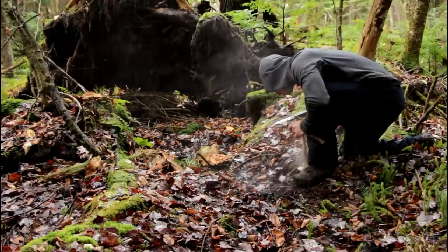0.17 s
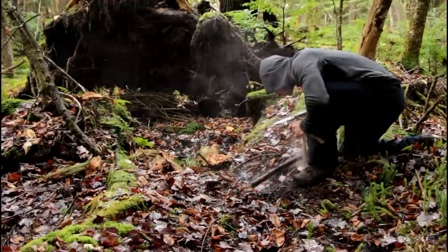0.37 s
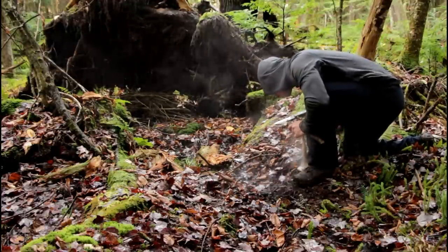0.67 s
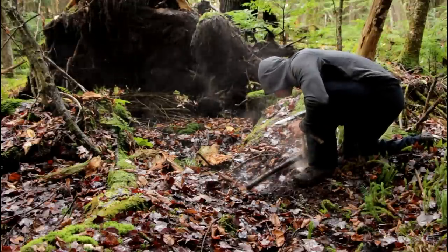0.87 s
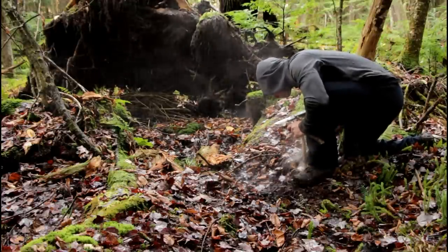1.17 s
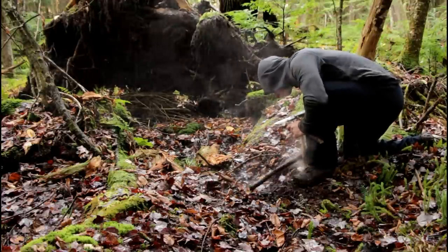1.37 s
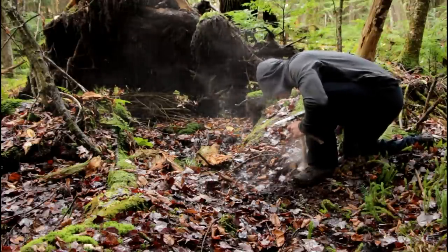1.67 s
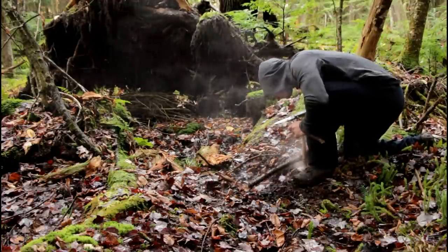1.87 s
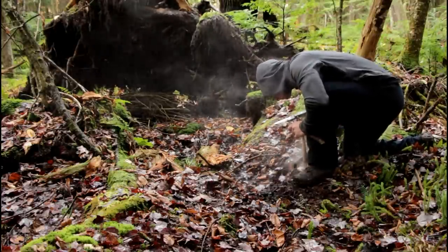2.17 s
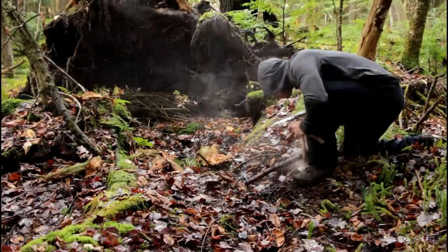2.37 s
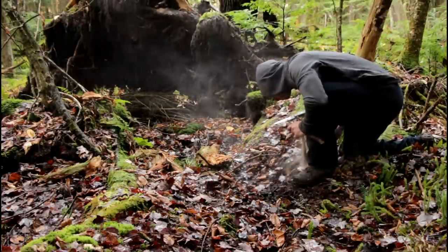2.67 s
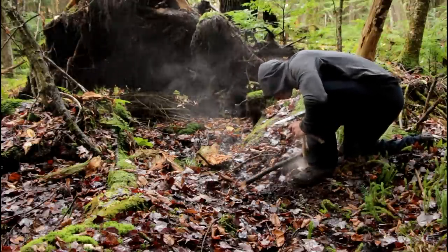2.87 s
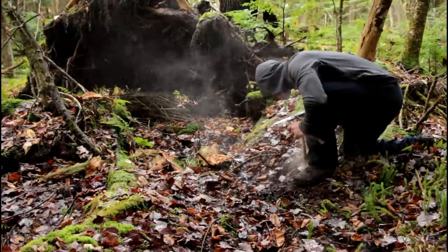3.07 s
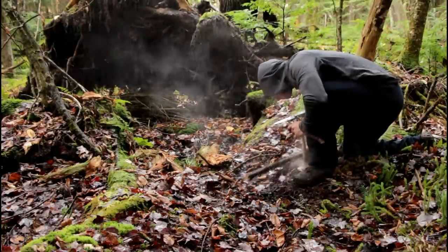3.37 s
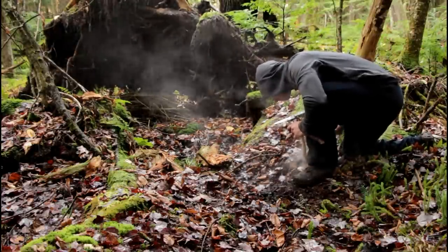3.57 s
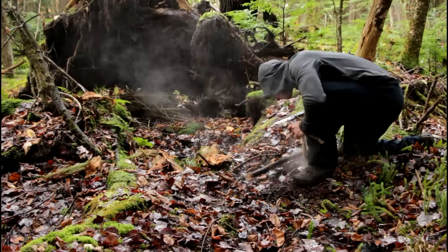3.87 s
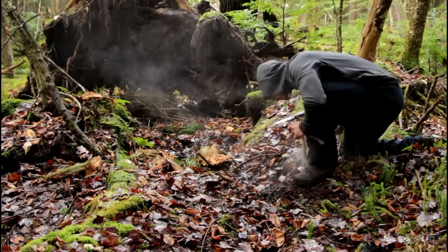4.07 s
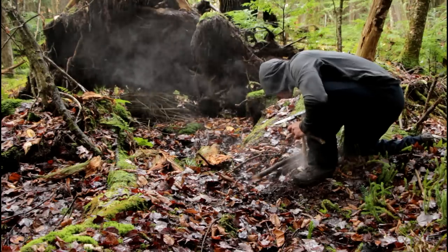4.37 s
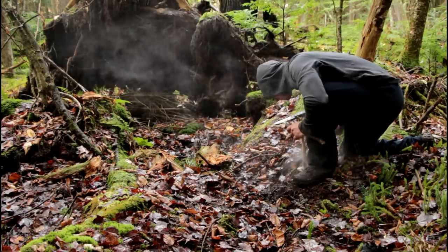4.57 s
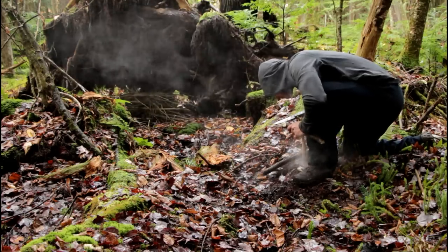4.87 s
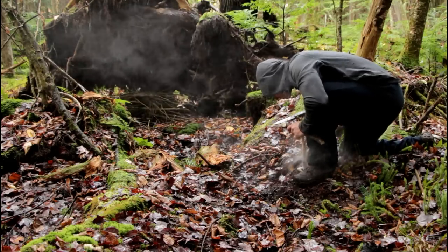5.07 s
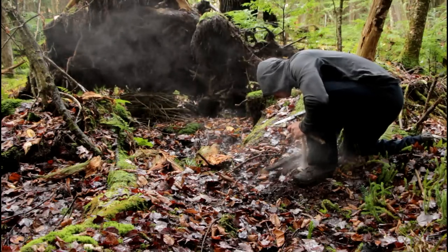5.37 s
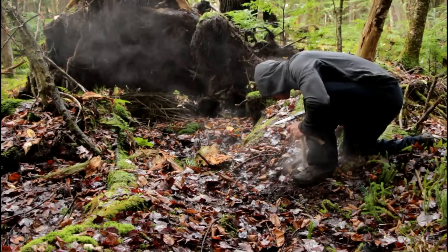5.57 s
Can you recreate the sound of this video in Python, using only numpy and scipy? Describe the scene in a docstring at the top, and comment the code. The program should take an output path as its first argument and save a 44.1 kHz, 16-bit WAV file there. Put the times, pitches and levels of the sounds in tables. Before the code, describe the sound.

Close outdoor sound of a bow drill on a forest floor. A hollow, dusty wooden grind on each push alternates with a high squeak on each pull, about two full cycles a second. Soft double thuds end the pushes, and small twigs snap irregularly. Past the middle a stick cracks loudly and the automatic gain dips, then slowly recovers. A harder push and short rustles follow. The stereo camera microphone also catches a faint forest stir.

```python
"""A bow drill starts with a push on a forest floor: the spindle grinds hollowly while small twigs snap and ticks fall.
Each push ends in a soft double thud of the board; each pull squeaks, often locking into a few pure chirps.
This goes on about twice a second; after 3.7 s a stick cracks loudly and makes the camera's gain control duck.
One push at 4.97 s is harder, then come short rustles. Noise makes the friction and rustles, bursts of fibres
the snaps, a gliding tone the squeak; a faint stir, a low hum and a short answer from the trees lie behind it all."""
import sys
import numpy as np
from scipy import signal
from scipy.fft import rfft, irfft, next_fast_len
from scipy.io import wavfile
from scipy.ndimage import uniform_filter1d, map_coordinates

SR = 44100
rng = np.random.default_rng(int(sys.argv[2]) if len(sys.argv) > 2 else 0)


def wav_out(sig):
    """Save sig, one row per channel (or a flat mono array), as 16-bit PCM at SR to the path in sys.argv[1]."""
    wavfile.write(sys.argv[1], SR, np.round(np.clip(np.atleast_2d(sig).T, -1, 1) * 32767).astype(np.int16))


N = 251806
TIME = np.arange(N) / SR


def amp(db):
    """Turn decibels into a gain."""
    return 10 ** (np.asarray(db) / 20)


def unit(x):
    """Scale to rms 1, a standard loudness."""
    return x / np.sqrt(np.mean(x ** 2) + 1e-20)


def along(points, hz):
    """Read a curve of (f/Hz, value) points, with frequency on a log axis."""
    f, value = np.transpose(points)
    return np.interp(np.log(hz + 1), np.log(f + 1), value)


def curves(rows):
    """Draw each column after the time as a curve with one value per sample."""
    s, *columns = np.transpose(rows)
    return [np.interp(TIME, s, column) for column in columns]


def wobble(rate):
    """A smooth random curve with rate random points a second."""
    points = rng.standard_normal(int(N * rate / SR) + 4)
    return map_coordinates(points, [TIME * rate])


def filtered(x, response):
    """Shape the frequencies of x by a complex response."""
    size = next_fast_len(N + SR // 2)
    hz = np.fft.rfftfreq(size, 1 / SR)
    return irfft(rfft(x, size) * response(hz), size)[..., :N]


def resonances(modes, f):
    """Response of things that ring: (f/Hz, width/Hz, level/dB) modes with alternating signs."""
    total = 0
    for k, (centre, width, db) in enumerate(modes):
        ring = 1j * f * width / (centre * centre - f * f + 1j * f * width)
        total = total + (-1) ** k * amp(db) * ring
    return total


# how alike left and right are: (f/Hz, likeness 0-1)
LIKENESS = [(60, .72), (130, 0.71), (290, 0.34), (640, 0.45), (1410, 0.32), (3100, 0.62), (6820, 0.48),
            (15000, 0.041)]


def spread(pair):
    """Two unrelated signals become left and right, more or less alike in each band; rms 1."""
    def turn(f):
        return np.arccos(np.clip(along(LIKENESS, f), 0, 1)) / 2
    mid, side = filtered(pair, lambda f: np.array([np.cos(turn(f)), np.sin(turn(f))]))
    return unit(np.array([mid + side, mid - side]))


def grains(response, rough_db, rate):
    """Stereo friction of rms 1: tiny slips, with rate random level points a second, through a response."""
    slips = rng.standard_normal((2, N)) * amp(rough_db * wobble(rate))
    return spread(filtered(slips, response))


def lead(x, delay):
    """Sound reaches the left side delay seconds before the right; below zero, the right comes first."""
    return filtered(x, lambda f: np.exp(1j * np.pi * f * delay * np.array([[1], [-1]])))


def add(track, s, sound):
    """Mix a sound into a track at time s."""
    part = track[..., max(round(s * SR), 0):][..., :sound.shape[-1]]
    part += sound[..., :part.shape[-1]]


def fracture(colour, t60, splinters, apart, size=4096):
    """A sharp release and a dying spray of fibres, coloured; as much energy as 10 ms at rms 1."""
    t = np.arange(size) / SR
    fibres = rng.standard_normal(size) + apart * rng.standard_normal((2, size))
    spray = fibres * amp(-60 * t / t60)
    force = rfft(splinters * spray - (t == 0))
    # even out the broad spectrum of the force, so that the colour alone sets the tone
    drive = np.sqrt(np.abs(uniform_filter1d(np.mean(np.abs(force) ** 2, axis=0), size=35)))
    wanted = colour(np.fft.rfftfreq(size, 1 / SR)) / drive
    # folding the cepstrum makes a filter that never sounds before the blow
    cepstrum = irfft(np.log(wanted + 1e-6))
    cepstrum[1:size // 2] *= 2
    cepstrum[size // 2 + 1:] = 0
    sound = irfft(force * np.exp(rfft(cepstrum)))
    return unit(sound) * np.sqrt(.01 * SR / size)


def hum():
    """A very faint, wavering 69 Hz hum, a sine whose phase wanders."""
    return amp(-84.0) * np.sin(2 * np.pi * 69 * TIME + .5 * wobble(3.22))


# colour of the forest's stir: (f/Hz, level/dB)
FOREST_COLOUR = [(25, -23), (52, -46), (69, -20), (82, -14), (150, -3), (350, 0), (1000, 0), (1800, -2),
                 (3000, -0.5), (5000, -6), (9000, -12.5), (16000, -20)]


def forest_stir():
    """The faint, steady stir of the forest: coloured noise."""
    return amp(-49.0) * grains(lambda f: amp(along(FOREST_COLOUR, f)), rough_db=2, rate=130)


# how long the answer takes to die by 60 dB: (f/Hz, t60/s)
TREE_DECAY = [(150, 0.22), (2000, 0.25), (12000, 0.05)]


def trees(x):
    """Trunks and the root wall scatter a short answer, made with a tail of dying noise."""
    noise = rng.standard_normal((2, SR // 3))
    hz, t, bands = signal.stft(noise, SR, nperseg=256)
    fade = amp(-60 * t / along(TREE_DECAY, hz)[:, None])
    tail = signal.istft(bands * fade, SR, nperseg=256)[1]
    return signal.fftconvolve(x, tail / np.linalg.norm(tail[0]), axes=1)[:, :N]


# swells of rough noise, one harder push at 4.97 s and then late rustles: (t/s, level/dB, half length/s)
ROUGH_SWELLS = [(4.974, -44, .03), (5.281, -36.5, 0.014), (5.38, -45.5, .11), (5.624, -41.5, 0.015)]
# colour of the rough noise: (f/Hz, level/dB)
ROUGH_COLOUR = [(100, -26), (480, 1.5), (900, -0.5), (2000, 0), (4000, 4), (9000, -3.5), (16000, -22)]


def rough_swells():
    """Rough noise that swells and fades: one harder push at 4.97 s, then late rustles."""
    swell = np.zeros(N)
    for s, db, width in ROUGH_SWELLS:
        swell += amp(db) * np.exp(-.5 * ((TIME - s) / width) ** 2)
    return swell * grains(lambda f: amp(along(ROUGH_COLOUR, f)), rough_db=2.5, rate=1200)


def damp_wood(f):
    """Damp wood gives off little of the highest treble."""
    return 1 / np.sqrt(1 + (f / 10500) ** 8)


def ticks(count=26):
    """Dry stalks and crumbs of char tick faintly at random times, each a tiny fracture."""
    out = np.zeros((2, N))
    for when, size, pitch in rng.random((count, 3)):
        hz = 1000 * 4 ** pitch
        colour = lambda f: damp_wood(f) * np.abs(resonances([(hz, 0.84 * hz, 0)], f)) ** 2.1
        tick = fracture(colour, t60=0.0059, splinters=0.14, apart=1.0)
        add(out, when * N / SR, amp(-57.5 + 7.2 * size) * tick)
    return out


# twig snaps, before the boosts and the sharpening in twigs():
# (t/s, level/dB, ring f/Hz, ring width/Hz, knock level/dB, splinter level/dB)
TWIG_SNAPS = [(0.01, -39.5, 1180, 800, -9.5, -18), (0.0187, -40.5, 2600, 1800, -19, -37),
              (0.2495, -49, 3480, 2400, -3, -21), (0.5046, -44.5, 2250, 1600, -12, -37),
              (0.8362, -43.5, 2390, 1700, -6, -21), (1.2225, -47, 2600, 1800, -4, -23),
              (1.357, -43.5, 1740, 1200, -7, -14), (1.7398, -31.5, 2320, 2660, -13.5, -17),
              (1.8676, -42, 1920, 1405, -11, -19), (1.9689, -44.5, 1770, 1200, -12, -33),
              (2.0313, -32, 2100, 1200, -20, -42), (2.4587, -41.5, 1450, 1000, -2, -22),
              (2.4845, -33, 3380, 2500, -26, -15), (2.6724, -34.5, 1750, 1320, -10.5, -10.5),
              (2.8207, -38, 2070, 1500, -11, -22), (2.8861, -37, 1760, 1209, -4.5, -34),
              (3.3996, -44.5, 2576, 1890, -10, -32), (3.8948, -47.5, 3700, 2600, -19, -29),
              (4.4429, -44.5, 2330, 1590, -13, -20), (4.8717, -50, 4430, 2980, -23, -25),
              (4.9262, -39.5, 1300, 1100, -28, -25), (5.5002, -35, 2270, 1710, -8, -8),
              (5.5977, -31, 3720, 653, -17, -36), (5.6042, -38.5, 3400, 300, -11, -36)]
# a typical snap's tear; more splinters tear for longer, twice as long for each 14 dB
TEAR_T60_S, TEAR_SPLINTER_DB, TEAR_DOUBLES_DB = .013, -23, 14


def twigs():
    """Small dry snaps: each fracture has its own ring, a knock in the ground and bright splinters."""
    out = np.zeros((2, N))
    for s, db, hz, width_hz, knock_db, splinter_db in TWIG_SNAPS:
        t60 = TEAR_T60_S * 2 ** ((splinter_db - TEAR_SPLINTER_DB) / TEAR_DOUBLES_DB)
        parts = [(hz, width_hz, 0), (420, 330, knock_db + 5), (8500, 5000, splinter_db)]
        # the power sharpens each peak
        colour = lambda f: damp_wood(f) * sum(np.abs(resonances([part], f)) ** 1.27 for part in parts)
        add(out, s, amp(db + 2.5) * fracture(colour, t60, splinters=0.23, apart=0.78))
    return out * amp([[-1], [.8]])


# the breaking stick and its bounces off the ground, before a 0.5 dB boost: (t/s, level/dB, t60/s)
STICK_CRACKS = [(3.7535, -14.5, .014), (3.7586, -29.5, 0.01), (3.761, -28.5, 0.035)]
# broad colour of the stick: (f/Hz, level/dB)
STICK_COLOUR = [(40, -31), (110, -27), (200, -4.5), (620, -2.5), (850, -5), (1100, -1), (1550, 1),
                (2400, -2), (3100, -10.5), (3900, -3.5), (5800, -9), (7500, -16.5), (10700, -15),
                (16000, -30)]


def stick():
    """A thicker stick breaks with one loud crack; its wood rings briefly in a few bands."""
    out = np.zeros((2, N))
    modes = [(340, 110, -5), (593, 180, -1.0), (1560, 190, -3.5), (2190, 123, -8.0),
             (3670, 170, -4.5), (4180, 120, -5), (5700, 220, 2)]  # (f/Hz, width/Hz, level/dB)
    colour = lambda f: amp(along(STICK_COLOUR, f)) * (0.9 + np.abs(resonances(modes, f)))
    for s, db, t60 in STICK_CRACKS:
        add(out, s, amp(db + 0.5) * fracture(colour, t60, splinters=0.21, apart=.2))
    return lead(out, delay=3e-5) * amp([[.4], [-.4]])


# steady beat: start of the first push, length of one push and pull, share of it spent pushing
FIRST_PUSH_S, CYCLE_S, PUSH_SHARE = 0.012, 0.4847, 0.508


def bow():
    """Spindle speed (0-1) and whether the bow is being pulled; the spindle stops at each turn."""
    beat = (TIME - FIRST_PUSH_S) / CYCLE_S % 1
    stroke = np.interp(beat, [0, PUSH_SHARE, 1], [0, 1, 2])
    return np.abs(np.sin(np.pi * stroke)), stroke >= 1


# the body leans in and rocks the board harder: (t/s, extra level/dB)
BODY_LEANS = [(1.68, 4.5), (5.08, 9.5)]
LEAN_S = 0.22  # how far from its middle a lean fades to 1/e
THUD_DB, THUD_EARLY_S, THUD_SCATTER_DB = -52, .024, 1  # the board rocks just before each push ends
SETTLE_S, SETTLE_DB = .026, -3.5  # the board drops back after rocking


def thuds():
    """Soft, low knocks of the board on damp soil near the end of each push, with a little scuff."""
    out = np.zeros((2, N))
    soil = [(40, -30), (100, -18.5), (165, 1.5), (250, -0.5), (400, -10.5),
            (1500, -19), (6000, -38), (16000, -70)]  # (f/Hz, level/dB)
    colour = lambda f: amp(along(soil, f))
    first = FIRST_PUSH_S + PUSH_SHARE * CYCLE_S - THUD_EARLY_S
    for s in np.arange(first, N / SR, CYCLE_S):
        lean_db = sum(extra * np.exp(-((s - when) / LEAN_S) ** 2) for when, extra in BODY_LEANS)
        db = THUD_DB + lean_db + THUD_SCATTER_DB * rng.standard_normal()
        for delay, drop_db in [(0, 0), (SETTLE_S, SETTLE_DB)]:
            knock = fracture(colour, t60=0.063, splinters=0.13, apart=.3)
            add(out, s + delay, amp(db + drop_db) * knock)
    return out


# in mid-pull the spindle may lock into pure chirps, before a 2.5 dB boost: (t/s, level/dB, length/s)
SQUEAL_TIMES = [(0.382, -26, .03), (0.883, -32, .01), (1.307, -36.5, .01), (1.829, -27.5, .04),
                (2.287, -37, .01), (2.319, -24, .01), (2.8, -30, .04), (3.282, -35, .03),
                (3.793, -30.5, .01), (4.269, -29, .03), (4.735, -31, .03), (5.223, -31, .03)]
STUTTER_S, STUTTER_FADE_DB = 0.0157, 2  # spacing and loss from chirp to chirp


def chirps():
    """Each squeal stutters at an even pace and fades: (t/s, level/dB) of every chirp."""
    out = []
    for s, db, length in SQUEAL_TIMES:
        for k, age in enumerate(np.arange(0, length, STUTTER_S)):
            out.append((s + age, db - STUTTER_FADE_DB * k))
    return out


# the pull bears down harder or softer, and its squeak drifts as the socket wears; spindle() reads it too.
# base values, shaped further by speed and wobble: (t/s, grinding level/dB, squeak level/dB, squeak f/Hz)
PULL_COURSE = [(0.4, -43, -33, 2855), (1.4, -45.5, -36, 2922), (2.3, -45, -36, 3015),
               (3.3, -44, -34.5, 2923), (4.3, -44.5, -36.5, 2973), (4.75, -47, -36, 2930),
               (5.25, -44.2, -39, 2913)]
CHIRP_DETUNE = 0.01194  # pitch scatter of the chirps, as a share


def squeak(speed, pulling):
    """On the pull the spindle sticks and slips near 3 kHz: a ragged tone that rises with speed and may lock."""
    level_db, pitch_hz = curves(PULL_COURSE)[1:]
    lock, surge = np.zeros(N), np.zeros(N)
    hz = pitch_hz * (1 + .045 * (speed - .95) + 0.01393 * wobble(260) + .008 * wobble(35))
    for s, db in chirps():
        age = TIME - s
        # it grabs faster than it lets go
        burst = np.exp(-.5 * (age / np.where(age < 0, .0024, .005)) ** 2)
        hold = np.exp(-.5 * (age / 0.00715) ** 2)
        chirp_hz = pitch_hz * (1 + CHIRP_DETUNE * rng.standard_normal())
        hz = hz + hold * (chirp_hz - hz)
        lock = np.maximum(lock, hold)
        surge = surge + amp(db + 2.5) * burst
    swell = amp(level_db - 1.0) * pulling * (0.48 * speed ** 1.47 + 0.1 * speed ** 9)
    carrier = np.exp(2j * np.pi * np.cumsum(hz) / SR)
    flutter = amp(3.2 * wobble(130) + 2.2 * wobble(45))
    # the ragged tone gives way while a chirp holds
    tone = (swell * flutter * (1 - 0.99 * lock) + surge) * carrier.real
    rasp = 0.65 * swell * np.real((wobble(520) + 1j * wobble(520)) * carrier)
    return (tone + rasp) * amp([[-2.4], [1.9]])


# broad colour of the grinding: (f/Hz, level/dB)
GRIND_COLOUR = [(60, -26), (200, -13.5), (400, -4), (900, -8), (1400, -12), (2000, -10.5), (3000, 0.5),
                (4000, -3), (5200, 1), (6300, -7), (7800, -4), (9300, -12), (11200, -10), (16000, -23.5)]
# how spindle and board ring on the push: (f/Hz, width/Hz, level/dB)
PUSH_RING = [(698, 52, -7), (1067, 110, -2.5), (1726, 124, -7.5), (2540, 460, -4), (4640, 160, -0.5),
             (7380, 390, -8), (10300, 390, -17)]
# how spindle and board ring on the pull: (f/Hz, width/Hz, level/dB)
PULL_RING = [(674, 170, -15), (1573, 134, -10), (2600, 470, -5.5), (4614, 92, -0.5), (7350, 770, -11),
             (10570, 190, -15.5)]
PUSH_DB = -43.5  # base level of the push, shaped further by speed and wobble
CREEP = .035  # a little grinding is left at a turn, while the spindle rocks in its socket


def spindle(speed, pulling):
    """Charred wood grinds in the socket: noise rings through a board loaded differently each way."""
    pull_db = curves(PULL_COURSE)[0]
    dust = grains(lambda f: amp(along(GRIND_COLOUR, f)), rough_db=1.5, rate=900)
    push = grains(lambda f: resonances(PUSH_RING, f), rough_db=0.5, rate=600)
    pull = grains(lambda f: resonances(PULL_RING, f), rough_db=2.5, rate=500)
    # the tip wanders in its socket, so the ringing comes and goes
    wander = amp(2.03 * wobble(45))
    ring = np.where(pulling, amp(2.5) * pull, amp(1.0) * push) * wander
    pressure = amp(np.where(pulling, pull_db, PUSH_DB) + 0.39 * wobble(40))
    rub = np.tanh(CREEP + 1.47 * speed ** 1.82)  # friction levels off in mid-stroke
    return pressure * rub * (amp(2.0) * dust + ring)


def scene():
    """The drill, a little to the right, and the ground and forest around it."""
    speed, pulling = bow()
    drill = spindle(speed, pulling) * amp([[-1.6], [1.3]]) + squeak(speed, pulling)
    work = lead(drill, delay=-0.0000034) + rough_swells() + forest_stir()
    hits = twigs() + ticks() + thuds() + stick()
    answer = trees(amp(-18.5) * work + amp(-28) * hits)
    return work + hits + answer + hum()


def gain_control(x, threshold_db, recover_db_per_s, attack):
    """A loud moment pulls the gain down; it then creeps back at a steady rate."""
    power = np.abs(uniform_filter1d(np.mean(x ** 2, axis=0), size=220))
    over_db = np.maximum(10 * np.log10(power + 1e-12) - threshold_db, 0)
    ramp = recover_db_per_s * TIME
    held_db = np.maximum.accumulate(over_db + ramp) - ramp
    keep = np.exp(-1 / (attack * SR))  # smooths the gain over attack seconds
    return x * amp(-signal.lfilter([1 - keep], [1, -keep], held_db))


TOP_HZ = 16000  # band limit of the camera


def record(dry):
    """The camera rides its gain, clips at full scale and fades out what lies above its band limit."""
    ridden = gain_control(dry, threshold_db=-23.0, recover_db_per_s=8, attack=0.016)
    clipped = np.clip(ridden, -1, 1)
    return filtered(clipped, lambda f: .5 - .5 * np.tanh((f - TOP_HZ) / 120))


dry = scene()
out = record(dry)
wav_out(out)
```